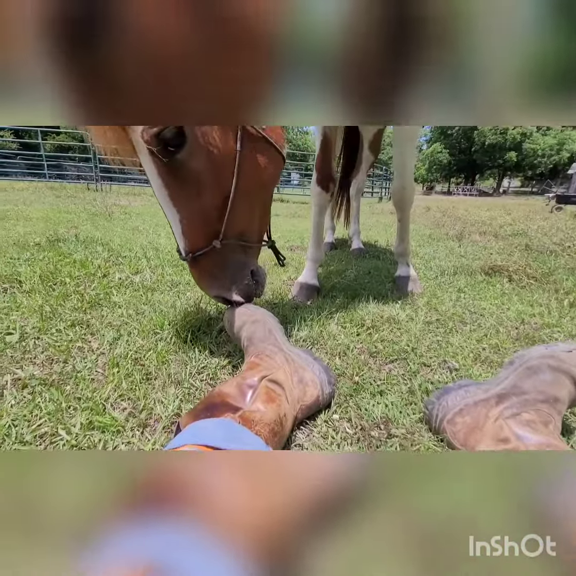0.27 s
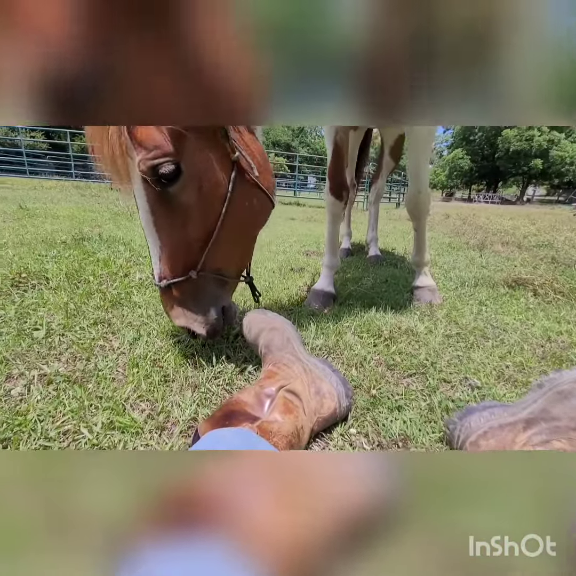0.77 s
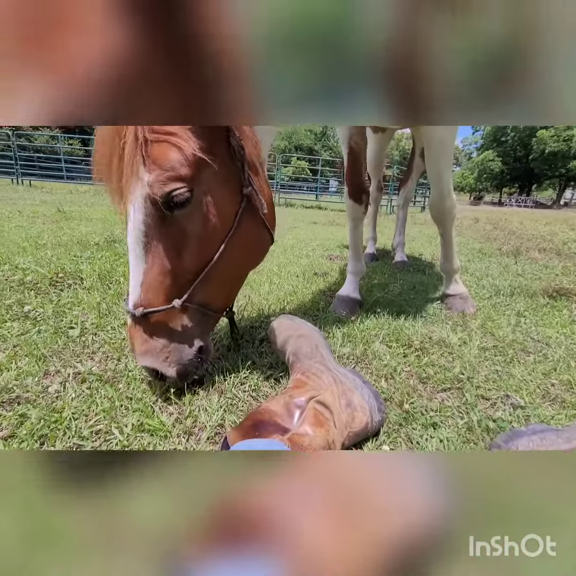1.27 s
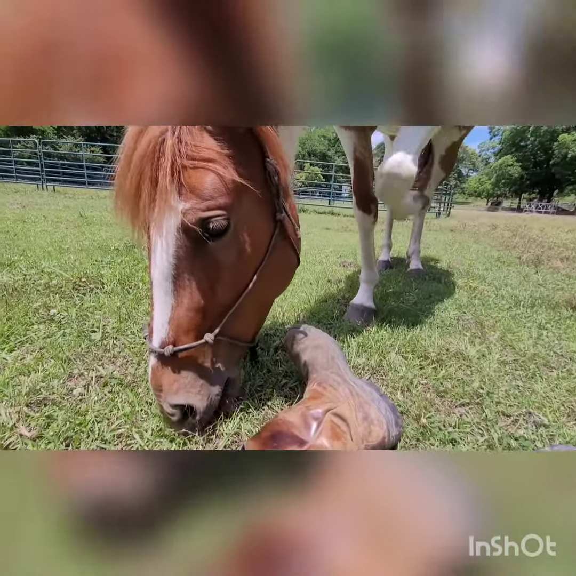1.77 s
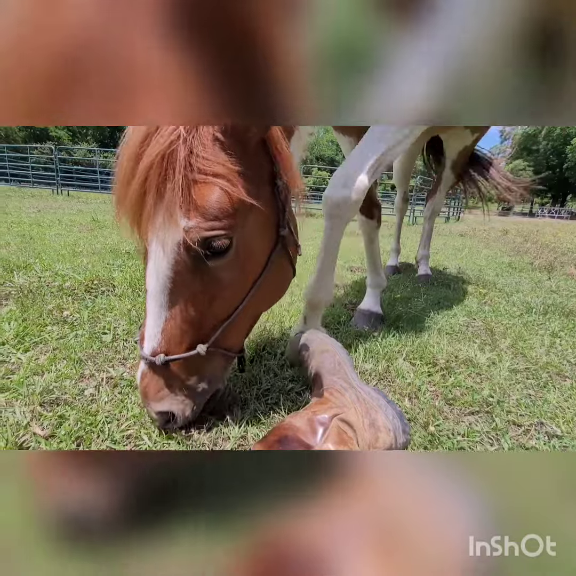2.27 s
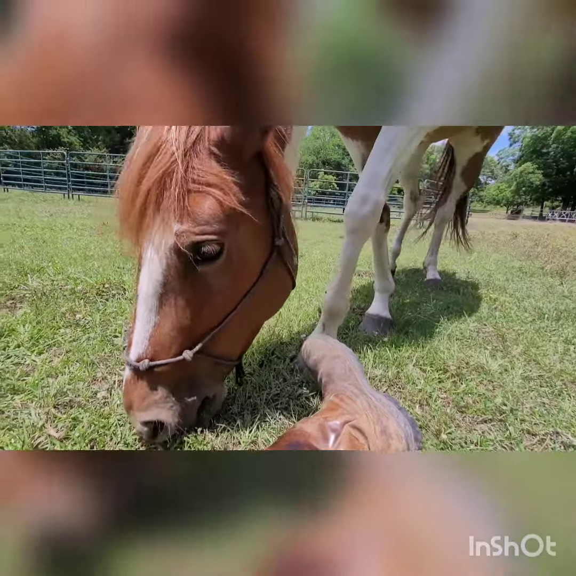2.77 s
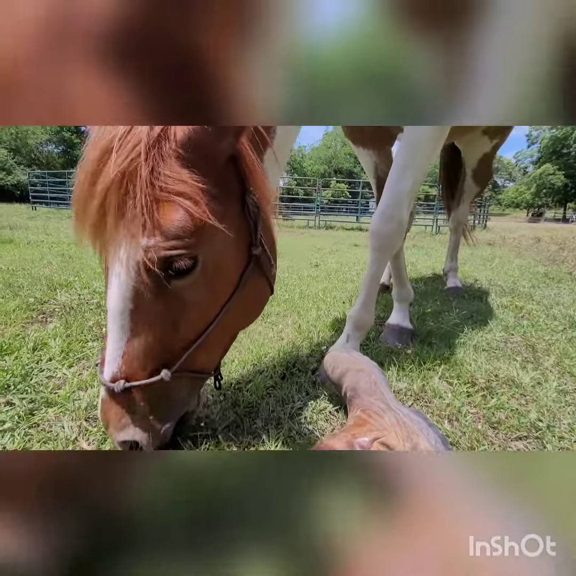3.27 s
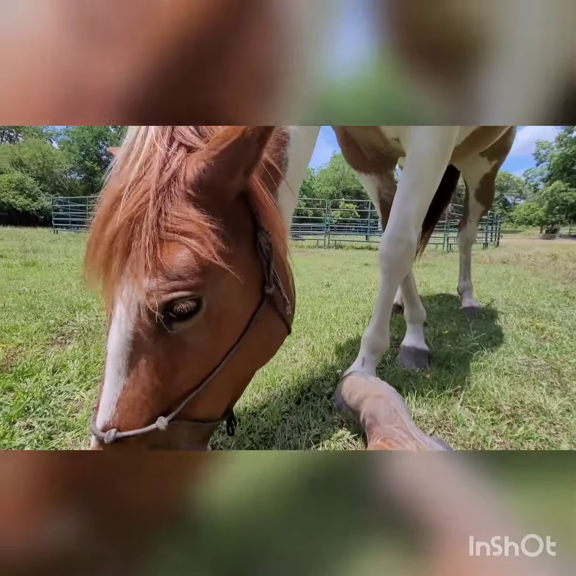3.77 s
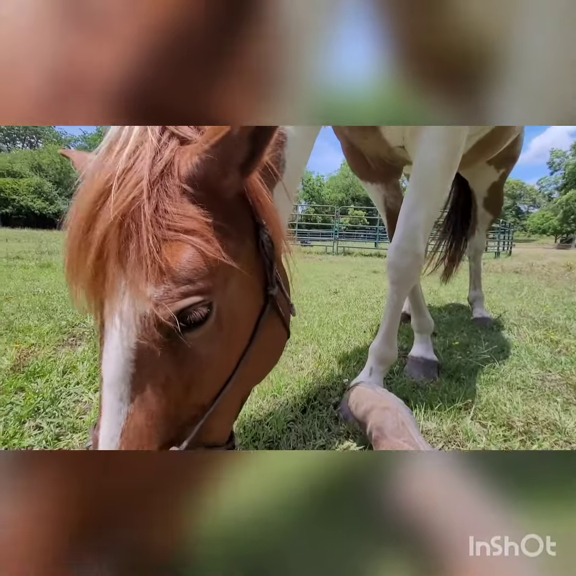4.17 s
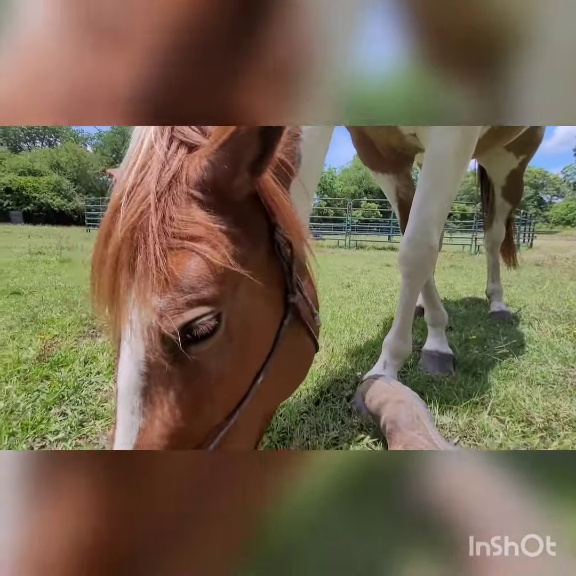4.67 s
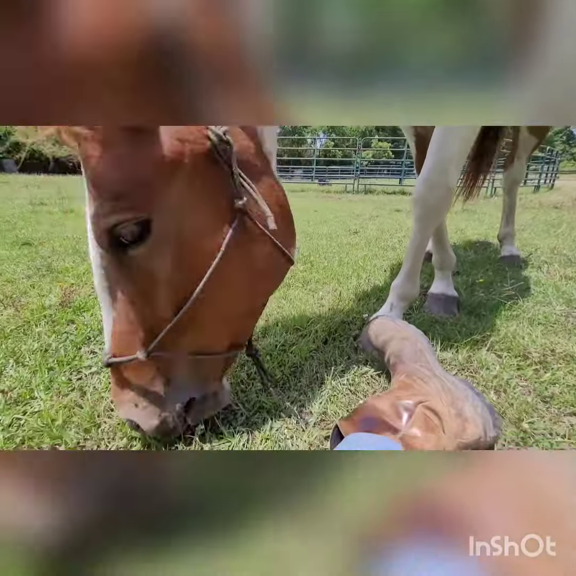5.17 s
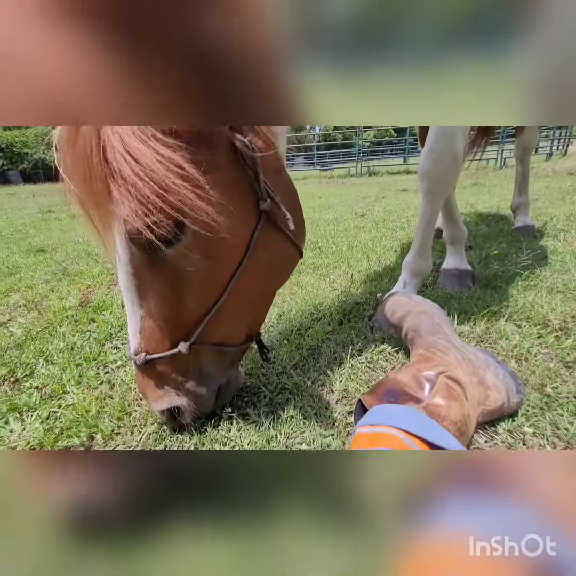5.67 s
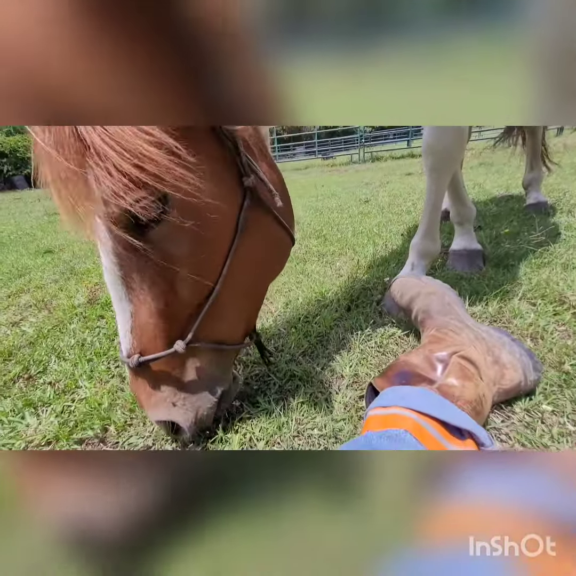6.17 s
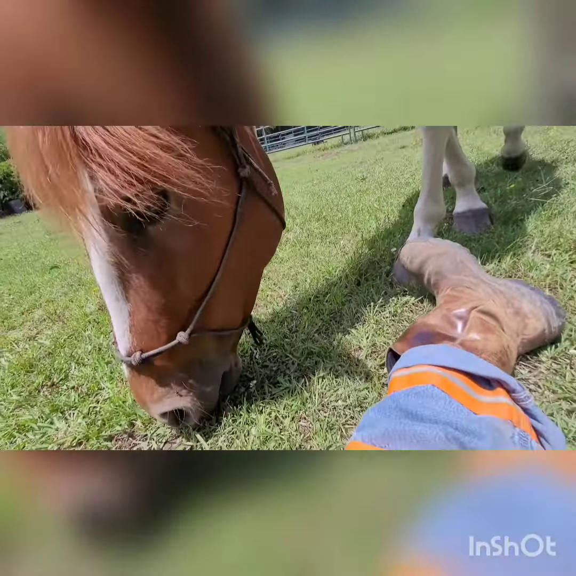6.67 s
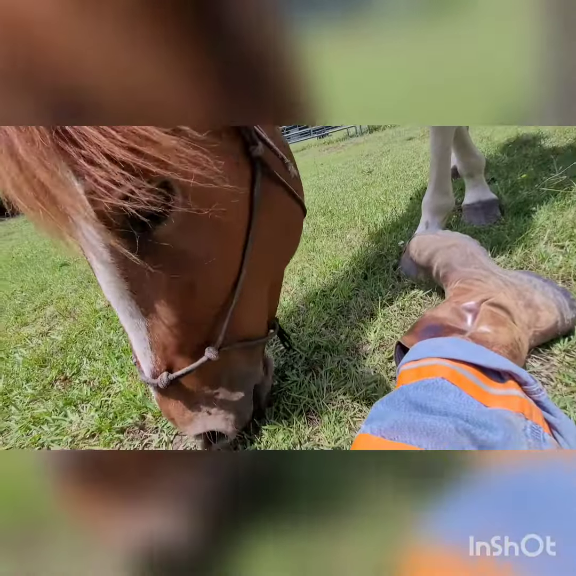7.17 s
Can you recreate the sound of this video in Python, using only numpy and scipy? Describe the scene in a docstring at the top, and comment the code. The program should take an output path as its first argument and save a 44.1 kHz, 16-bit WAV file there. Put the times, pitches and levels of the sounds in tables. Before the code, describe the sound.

Soft breaths and rustling blades open this close outdoor sound of a horse feeding. A dull hoof thud comes with the first bite, and five more crunchy rips of grass follow at an even pace, the last two loudest. Between bites the horse chews with hollow knocks and little lip smacks. Underneath are a quiet, wavering low hum, gentle wind on the microphone and a few faint chirps.

```python
"""A horse grazing in a paddock

Close to a two-port (left and right) microphone, the muzzle rustles and snuffles in the grass and the
teeth tear off tufts, whose breaking fibres crackle. The jaw knocks, lips pop, hooves thud on the turf.
Behind it all are a low hum, gusts of rumbling wind and faint chirps."""
import sys
import numpy as np
from scipy import signal
from scipy.io import wavfile
from scipy.ndimage import uniform_filter1d

SR = 44100
rng = np.random.default_rng(int(sys.argv[2]) if len(sys.argv) > 2 else 0)


def master_out(mix):
    """Clip the mix to full scale and print it as 16-bit PCM to the path in sys.argv[1]."""
    frames = np.transpose(np.atleast_2d(mix))
    ceiling = np.clip(frames, -1, 1)
    pcm = np.round(ceiling * 32767).astype(np.int16)
    wavfile.write(sys.argv[1], SR, pcm)


N = 327699
TIME = np.arange(N) / SR


def gain_of(db):
    return 10 ** (np.asarray(db) / 20)


def unit_power(x):
    return x / np.sqrt(np.mean(x ** 2) + 1e-20)


def at_frequency(table, hz):
    f, value = np.transpose(table)
    return np.interp(np.log(hz + 1), np.log(f + 1), value)


def over_time(table):
    """Joins the rows of a time table into one curve per column."""
    times, *columns = np.transpose(table)
    return [np.interp(TIME, times, column) for column in columns]


def add(mix, start, sound):
    part = mix[..., round(start * SR):][..., :sound.shape[-1]]
    part += sound[..., :part.shape[-1]]


def resonate(x, hz, width_hz):
    """Lets x ring in a band around hz, which may glide."""
    turn = np.exp(2j * np.pi * np.cumsum(hz * np.ones(len(x))) / SR)
    decay = np.exp(-np.pi * width_hz / SR)
    return 2 * (turn * signal.lfilter([1 - decay], [1, -decay], x / turn + 1e-18)).real


def colour(x, spectrum):
    """Gives each click in x a short tail with this spectrum."""
    db = at_frequency(spectrum, abs(np.fft.fftfreq(4096, 1 / SR)))
    log_gain = np.log(gain_of(np.maximum(db, -100)))
    tail = np.fft.ifft(np.exp(log_gain - 1j * signal.hilbert(log_gain).imag)).real[:1024]
    return signal.oaconvolve(x, tail[None] / np.linalg.norm(tail), axes=1)[:, :N]


def crackle(per_s, spread_db, shared):
    """Random clicks of very unequal size; some reach both ports alike."""
    size = gain_of(spread_db * np.minimum(rng.exponential(1, (3, N)), 4))
    sign = rng.choice([-1., 1.], (3, N))
    clicks = size * sign * (rng.random((3, N)) < per_s / SR)
    return unit_power(shared * clicks[0] + (1 - shared) * clicks[1:])


def thumps(table, rise, sag):
    """Soft blows on flesh or soil: a few waves that swell, sag in pitch and die away."""
    out = np.zeros(N)
    for t, db, hz, cycles in table:
        turns = np.arange(round(10 * SR / hz)) * hz / SR
        envelope = (1 - np.exp(-(turns / rise) ** 2)) * np.exp(-2.3 * turns / max(cycles, .3))
        wave = envelope * np.sin(2 * np.pi * (turns + sag * (1 - np.exp(-turns))))
        add(out, t - np.argmin(wave) / SR, gain_of(db) * wave / abs(wave).max())  # deepest dip at t
    return out


def swells(table, taper):
    """Two loudness curves, with a rounded swell centred on each row's time."""
    out = np.zeros((2, N))
    for middle, length, *levels_db in table:
        swell = signal.windows.tukey(round(length * SR), taper)
        add(out, middle - length / 2, gain_of(levels_db)[:, None] * swell)
    return out


# How alike left and right sound: f/Hz, likeness (1 = the same)
LIKENESS = [(40, 0.71), (120, 0.98), (400, 0.71), (1000, 0.65), (2000, 0.24), (4000, 0.12), (8000, 0.039),
            (15000, 0.063)]
def noise(spectrum, size, patchy_db):
    """Left and right noise with drifting louder and softer patches."""
    hz = np.fft.rfftfreq(size, 1 / SR)
    a, b, c, d, patches = rng.standard_normal((N * 4 // size + 5, len(hz), 5)).T
    patches = unit_power(uniform_filter1d(uniform_filter1d(patches, size=6, axis=0), size=8, axis=1))
    alike = np.clip(at_frequency(LIKENESS, hz), -1, 1)[:, None]
    left = a + 1j * b
    right = alike * left + np.sqrt(1 - alike ** 2) * (c + 1j * d)
    bands = np.array([left, right]) * gain_of(at_frequency(spectrum, hz)[:, None] + patchy_db * patches)
    return unit_power(signal.istft(bands, nperseg=size, noverlap=size * 3 // 4)[1][:, :N])


# Gusts of wind: t/s, level/dB
GUSTS = [(0.0, -69.5), (0.7, -55), (1.0, -65.5), (1.6, -55), (2.2, -55.5), (2.75, -60.5), (3.95, -58),
         (4.25, -62.5), (5.25, -57), (6.35, -69.5), (6.65, -57.5), (7.43, -54)]
# Tone colours of the wind and of still air: f/Hz, level/dB
WIND_COLOUR = [(25, -42), (40, -6), (56, 0), (90, -6.5), (160, -5.5), (260, -7.5), (340, -42.5)]
AIR_COLOUR = [(100, -9), (240, -2.5), (500, -25), (1250, -38), (1950, -30.5), (3200, -37), (3900, -27.5),
              (7400, -25.5), (8500, -35.5), (9600, -30), (10800, -33), (15000, -56)]
def wind_and_air():
    """Wind rumbles at the microphone over the soft hiss of still air."""
    gust_db, = over_time(GUSTS)
    wind = gain_of(gust_db) * noise(WIND_COLOUR, size=2048, patchy_db=4.0)
    return wind + gain_of(-63.5) * noise(AIR_COLOUR, size=1024, patchy_db=2.46)


# The wavering of the hum: t/s, level/dB
HUM_LEVELS = [(0.08, -51.5), (0.3, -61.5), (0.5, -43.5), (0.9, -55), (1.28, -50), (1.9, -48.5), (2.04, -61),
              (2.4, -56), (2.77, -52), (2.86, -64.5), (3.04, -51), (3.21, -72), (3.35, -49.5), (3.6, -63.5),
              (3.7, -51), (3.95, -55), (4.15, -75), (4.45, -53), (4.84, -63.5), (5.55, -51.5), (5.9, -73),
              (6.1, -54), (6.37, -64), (6.52, -53.5), (6.85, -54.5), (7.08, -59), (7.43, -54)]
def hum():
    """A slowly sinking tone with a little fuzz around it, and a fainter tone above."""
    hz = 203.9 - 1.15 * TIME
    db, = over_time(HUM_LEVELS)
    tone = np.sqrt(2) * np.sin(2 * np.pi * np.cumsum(hz) / SR)
    fuzz = unit_power(resonate(resonate(rng.standard_normal(N), hz, width_hz=25), hz, width_hz=27))
    upper = unit_power(resonate(rng.standard_normal(N), hz=391, width_hz=3.8))
    return gain_of(db) * (tone + gain_of(-23.5) * fuzz) + gain_of(-81.5) * upper


# Faint chirps and one squeak of wet grass: t/s, length/s, first f/Hz, last f/Hz, width/Hz, level/dB
WHISTLES = [(0.375, 0.042, 4880, 6900, 500, -67.5), (0.528, 0.076, 4900, 6960, 500, -61.5),
            (0.844, 0.13, 7600, 8400, 250, -75), (0.964, 0.13, 2320, 1970, 100, -81.5),
            (1.719, .045, 2200, 1970, 150, -65), (6.097, 0.032, 2000, 2630, 150, -51),
            (6.219, 0.08, 6500, 7450, 800, -59), (6.305, 0.088, 6000, 7560, 900, -59.5)]
def chirps(rise_s=.006):
    """Fuzzy whistles that slide quickly up or down, then level off."""
    out = np.zeros((2, N))
    for start, length, from_hz, to_hz, width_hz, db in WHISTLES:
        progress = np.linspace(0, 1, round(length * SR))
        hz = to_hz + (from_hz - to_hz) * np.exp(-5.5 * progress)
        hiss = rng.standard_normal((2, 6000))[:, :len(progress)]
        whistle = unit_power(np.array([resonate(side, hz, width_hz) for side in hiss]))
        envelope = np.minimum(progress * length / rise_s, 1) * np.sqrt(1 - progress)
        add(out, start, gain_of(db) * envelope * whistle)
    return out


# Steps on the turf: t/s, level/dB, f/Hz, length/cycles
STEPS = [(.203, -44, 50, 1.4), (1.322, -38.5, 58.6, 1.8), (1.994, -38.5, 55, 1.4), (2.283, -21, 67.5, 2.3),
         (7.16, -41, 55, 4.1)]
def hooves(lag_samples=40):
    """Low hoof thuds on the turf, a little later in the right channel."""
    thuds = thumps(STEPS, rise=0.087, sag=0.054)
    return np.array([thuds, np.roll(thuds, lag_samples)])


# The hollow tone of the first, free breath: t/s, f/Hz, level/dB
FIRST_BREATH = [(.42, 375, -82), (.53, 390, -59), (.64, 496, -60.5), (.8, 590, -88)]
def nostril():
    """Breath rings in the nostril, rising in pitch as it flares."""
    hz, db = over_time(FIRST_BREATH)
    breath = resonate(rng.standard_normal(N), hz, width_hz=270)
    return gain_of(db) * unit_power(resonate(breath, hz, width_hz=240))


# The muzzle resting in the grass: t/s, rustle level/dB, chewing level/dB
RESTING = [(1.2, -93, -92), (1.45, -68, -81.5), (2.1, -64.5, -65), (2.68, -69, -75.5), (3.0, -64, -65.5),
           (3.25, -72.5, -80), (4.05, -64, -64), (4.3, -66.5, -70.5), (4.65, -67.5, -68), (5.0, -65.5, -70),
           (5.5, -65.5, -65), (6.0, -67, -79.5), (6.8, -61.5, -65), (7.43, -65, -69)]
# Lips gathering blades: t/s, length/s, rustle level/dB, chewing level/dB
GATHERING = [(1.58, 0.13, -54, -71.5), (1.735, 0.086, -61, -66.5), (1.83, .12, -53.5, -63.5),
             (1.99, 0.17, -64, -65), (2.22, 0.11, -58, -57.5), (2.445, 0.13, -63, -80),
             (2.53, 0.15, -61, -82), (2.61, 0.15, -56.5, -63.5), (2.75, 0.19, -63, -66.5),
             (3.3, 0.34, -64.5, -75), (3.675, .12, -56, -60), (3.73, 0.046, -64, -71),
             (3.78, .03, -62.5, -80), (3.97, 0.068, -57, -75), (4.17, 0.12, -55, -63.5),
             (4.43, 0.13, -58.5, -61), (4.54, 0.14, -63.5, -63), (4.93, 0.2, -62, -62.5),
             (5.157, 0.13, -58, -67), (5.56, 0.11, -58.5, -63.5), (5.662, 0.095, -46.5, -56.5),
             (5.81, 0.21, -61, -63.5), (5.98, 0.17, -60, -60), (6.17, 0.19, -62, -63.5),
             (6.325, 0.073, -68, -69), (6.436, 0.086, -59.5, -69), (6.61, 0.058, -51.5, -56),
             (6.68, 0.3, -59.5, -63.5), (6.83, 0.087, -64, -63), (7.134, 0.049, -52.5, -67),
             (7.18, 0.069, -62, -58.5), (7.27, 0.13, -59, -61.5), (7.415, 0.1, -52.5, -62)]
# Breaths blown into the grass: t/s, length/s, rustle level/dB, breath level/dB
BREATHS = [(.61, 0.55, -68.5, -58), (1.375, 0.24, -66, -55), (3.88, 0.33, -67, -49.5),
           (5.38, 0.34, -53, -57)]
# Tone colours of dry blades, moist chewing and breath: f/Hz, level/dB
BLADE_COLOUR = [(1400, -14), (2500, 0), (4000, -3.5), (7500, 0), (12000, 1), (15500, -5.5)]
CHEW_COLOUR = [(250, -25), (400, 0), (700, -3.5), (1200, -2), (2500, -6.5), (5000, -10), (9000, -44)]
BREATH_COLOUR = [(180, 5), (300, 2.5), (450, -6), (800, -6), (1300, -10), (2800, -14.5), (6000, -19),
                 (9000, -66)]
def muzzle():
    """Blades brush each other in a fine, grainy rustle; chewing and breath sound below it."""
    rustle, chew = np.hypot(gain_of(over_time(RESTING)), swells(GATHERING, taper=0.97))
    stir, breath = swells(BREATHS, taper=1.0)
    clicks = crackle(per_s=3000, spread_db=6.5, shared=0.34)
    blades = unit_power(noise(BLADE_COLOUR, size=256, patchy_db=4.5) + 0.61 * colour(clicks, BLADE_COLOUR))
    moist = unit_power(noise(CHEW_COLOUR, size=512, patchy_db=4.0) + 0.64 * colour(clicks, CHEW_COLOUR))
    snuffle = noise(BREATH_COLOUR, size=512, patchy_db=1.5)
    touch = np.hypot(rustle, stir)
    tips = -unit_power(np.diff(blades, 2, prepend=0, append=0))  # thin tips sound high and bright
    tip_share = 0.39 * touch / (touch + 1.8 * chew)  # less chewing, more tips
    return touch * ((1 - tip_share) * blades + tip_share * tips) + chew * moist + breath * snuffle


# Pops of the lips: t/s, level/dB, f/Hz
LIP_POPS = [(1.715, -54.5, 2050), (3.134, -58, 1400), (4.273, -58, 1840), (5.093, -50, 1020),
            (5.133, -48.5, 1020), (5.431, -42, 1120), (5.539, -49, 961), (5.555, -43, 1130),
            (5.785, -41.5, 990), (5.795, -44, 1050), (6.323, -56, 1130), (6.478, -52, 980),
            (7.031, -41, 1310), (7.174, -44, 1110), (7.191, -44.5, 1210), (7.258, -43.5, 1450),
            (7.377, -43.5, 940)]
def lips(cycles=5.1):
    """The lips pop, each time with a tiny, quick ring."""
    return thumps([(*pop, cycles) for pop in LIP_POPS], rise=0.35, sag=0.027)


# Knocks of the jaw: t/s, level/dB, f/Hz, length/cycles, mouth ring compared with the knock/dB
JAW_KNOCKS = [(1.596, -51, 200, 1, 4), (1.839, -39.5, 190, 1.3, -13), (1.913, -39.5, 220, 1.2, -2),
              (2.079, -43.5, 218, 2.1, -14), (2.612, -39.5, 212, 1.2, -4.5), (2.917, -41, 166, 1.3, -16),
              (3.687, -38.5, 212, 0.87, -7), (3.766, -40.5, 252, 1.2, -15), (3.989, -40, 142, 2, -17),
              (4.187, -35.5, 130, 0.23, -10), (4.433, -38, 198, 1.2, -36), (4.504, -39, 210, 1.1, -2.5),
              (5.046, -38.5, 135, 0.52, -15), (5.197, -41, 157, 0.52, -14), (5.669, -43, 238, 0.64, -3),
              (5.739, -42.5, 245, 1.7, -4.5), (5.953, -37.5, 180, 2.2, -17), (6.035, -36.5, 382, 2.6, -22),
              (6.082, -27, 305, 0.37, -20), (6.609, -42, 212, 0.73, -6), (6.86, -32.5, 200, 1.4, -23),
              (6.951, -37, 256, 1.1, -1), (7.339, -31, 300, 1.16, -5.5)]
def jaw(mouth_hz=610, mouth_cycles=3.4, rebound_s=.013):
    """Each knock also rings the hollow of the mouth, which never has quite the same shape twice."""
    shapes = np.exp(0.12 * rng.standard_normal((len(JAW_KNOCKS), 2)))
    rings = [(t, db + ring_db, mouth_hz * pitch, mouth_cycles * stretch ** 3)
             for (t, db, _, _, ring_db), (pitch, stretch) in zip(JAW_KNOCKS, shapes)]
    ring = thumps(rings, rise=0.69, sag=0.085)
    ring += gain_of(-11) * np.roll(ring, round(rebound_s * SR))  # the teeth meet again, softer
    return thumps([knock[:4] for knock in JAW_KNOCKS], rise=1.0, sag=0.016) + ring


# The loudest stalks breaking: t/s, level/dB, extra treble/dB
STALKS = [(2.118, -39, 16), (2.1504, -26, 1), (2.1574, -19, -16), (2.1641, -20, -17), (2.1742, -27, 5),
          (2.1814, -25.5, -13), (2.22, -28, -2), (2.234, -29, -7.5), (2.2747, -25.5, 5), (2.9377, -34, -3),
          (2.9485, -31, -5), (2.9792, -22.5, 0.5), (2.9845, -25, -2.5), (2.9996, -16.5, -2),
          (3.01, -16, -4.5), (3.0563, -27.5, 3), (3.0813, -26, -2), (3.2692, -57, 20), (4.013, -32.5, 2.5),
          (4.0476, -24.5, -3), (4.0557, -22, -11), (4.079, -21.5, -8), (4.094, -23, -9),
          (4.183, -27.5, -14), (4.5555, -32, -5), (4.7244, -32.5, 6), (4.7475, -26, -9.5),
          (4.7563, -20, -8), (4.7686, -23.5, 4.5), (4.7968, -24.5, 8.5), (4.808, -22, 2.5),
          (4.8859, -32.5, -1), (5.432, -28.5, -6.5), (5.9493, -25.5, 2), (5.9855, -29, -1),
          (6.0137, -23, -0.5), (6.0355, -11.5, -9.5), (6.0561, -26.5, -1), (6.0611, -17, -21),
          (6.0792, -16.5, -5), (6.085, -19.5, -5), (6.9035, -21.5, 3), (6.9211, -27.5, 10.5),
          (6.9467, -17, 0), (6.9546, -22, 2.2), (6.9744, -15, -2), (6.98, -22, 1), (7.0118, -37, 10.5),
          (7.031, -25.5, -16), (7.1357, -34.5, 4)]
def snapping_stalks():
    """Each stalk breaks with a click and a short frayed tail; returns a low and a high part."""
    low, high = np.zeros((2, 2, N))
    fray = np.exp(-np.arange(300) / (0.0022 * SR))
    for t, db, treble_db in STALKS:
        shared, left, right, place = rng.standard_normal((4, 300))
        crack = fray * (shared + 1.94 * np.array([left, right]))
        crack *= 1.435 / np.linalg.norm(crack, axis=1, keepdims=True)
        crack[:, 4] = -0.84  # the click itself
        pan_db = -4 + 3.5 * place[0]  # a little to the right, scattered across the tuft
        crack *= gain_of(db + np.array([[pan_db / 2], [-pan_db / 2]]))
        add(low, t - .0006, crack)
        add(high, t - .0003, crack * gain_of(treble_db))
    return low, high


# Torn or trampled tufts: t/s, length/s, level/dB, extra treble/dB, dryness (-1 wet to 1 dry)
TUFTS = [(2.126, .075, -46, -1.5, 0.55), (2.249, 0.068, -52, 5.5, 0.44), (2.965, .14, -46, -3.5, 0.066),
         (4.012, 0.14, -49.5, -4, -0.19), (4.748, 0.14, -47, -3.5, -0.11), (6.025, 0.11, -43, -8.5, -0.44),
         (6.898, 0.12, -39.5, -4, -0.34)]
# Tone colours of a tear's juicy low part and dry high part: f/Hz, level/dB
JUICY_COLOUR = [(50, -8), (120, -4.5), (300, 1.5), (380, -5.5), (630, -6.5), (1400, -4), (2500, -5),
                (4500, -19.5), (7000, -69.5)]
DRY_COLOUR = [(1700, -11), (3000, -5), (6000, -1), (11000, 1), (15500, -4)]
def tearing(grip_share=0.29, hold_share=0.35, lag_samples=8):
    """A pull grips fast, holds, then lets go: hundreds of fibres part and single stalks crack on top."""
    fibres = unit_power(crackle(per_s=1500, spread_db=6, shared=0.55) + 0.68 * rng.standard_normal((2, N)))
    thin_fibres = 1.11 * fibres + 0.56 * fibres[:, ::-1]  # these also part on their own
    low, high = snapping_stalks()
    for start, length, pull_db, treble_db, _ in TUFTS:
        progress = (TIME - start) / length
        rise_db = np.interp(progress, [0, grip_share, hold_share], [-13.5, 2.5, 0])
        fall_db = -17 * (np.maximum(progress - hold_share, 0) / (1 - hold_share)) ** 2
        pull = gain_of(pull_db + rise_db + fall_db) * (progress > 0)
        low += pull * fibres
        high += pull * gain_of(treble_db) * thin_fibres
    low = 0.66 * low + 0.24 * low[::-1]  # long waves reach both ports
    low += gain_of(-9.5) * resonate(low.sum(axis=0), hz=865, width_hz=384)  # the open mouth rings
    dryness = over_time(TUFTS)[-1]
    high = (high - dryness * np.roll(high, 1, axis=1)) / np.hypot(1, dryness)  # drier is brighter
    high[1] = np.roll(high[1], lag_samples)  # treble reaches the right port later
    return colour(low, JUICY_COLOUR) + colour(high, DRY_COLOUR)


def scene():
    """The field and the horse together, left and right."""
    centre = hum() + jaw() + lips() + nostril()
    return centre + hooves() + wind_and_air() + muzzle() + tearing() + chirps()


# The microphone's tone colour: f/Hz, level/dB
MIC_COLOUR = [(5000, -0.16), (8800, -1.5), (10500, -2), (14000, 6)]
# How much louder the left port is than the right: f/Hz, level/dB
BALANCE = [(60, -0.7), (500, 1.85), (1000, 1.5), (4000, 4.5), (8000, -1), (15000, -0.3)]
def record(dry, low_cut_hz=36, high_cut_hz=15900):
    """The microphone drops the deepest bass and highest treble; each port colours the rest its own way."""
    hz = np.linspace(0, SR / 2, 257)
    mic_db, balance_db = at_frequency(MIC_COLOUR, hz), at_frequency(BALANCE, hz)
    ports = [signal.firwin2(255, hz, gain_of(mic_db + side * balance_db / 2), fs=SR) for side in (1, -1)]
    low_cut = signal.butter(2, low_cut_hz, "high", fs=SR, output="sos")
    high_cut = signal.firwin(401, high_cut_hz, window=("kaiser", 8), fs=SR)
    coloured = signal.oaconvolve(signal.sosfilt(low_cut, dry), np.array(ports), "same", axes=1)
    return signal.oaconvolve(coloured, high_cut[None], "same")


dry = scene()
out = record(dry)
master_out(out)
```